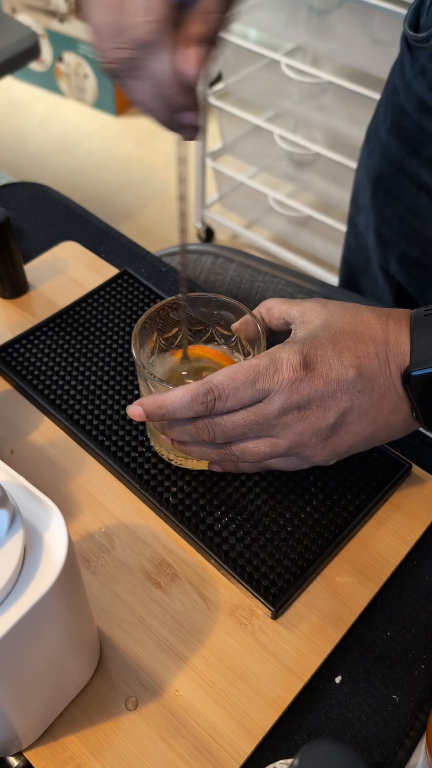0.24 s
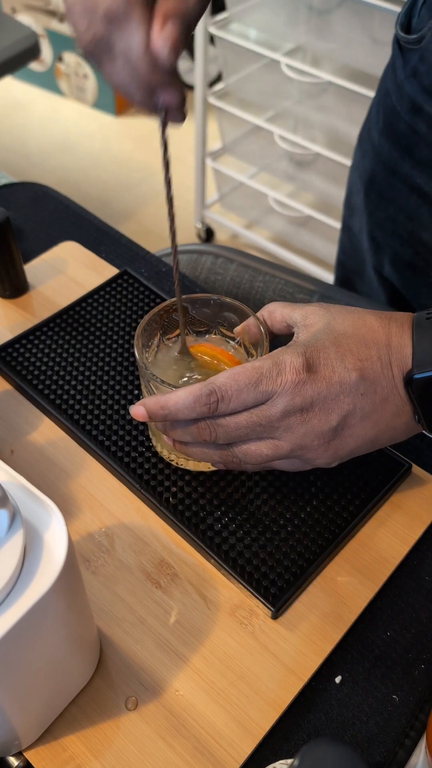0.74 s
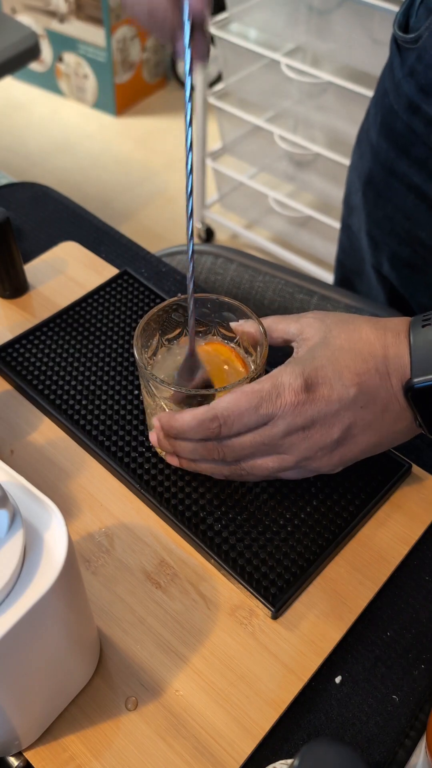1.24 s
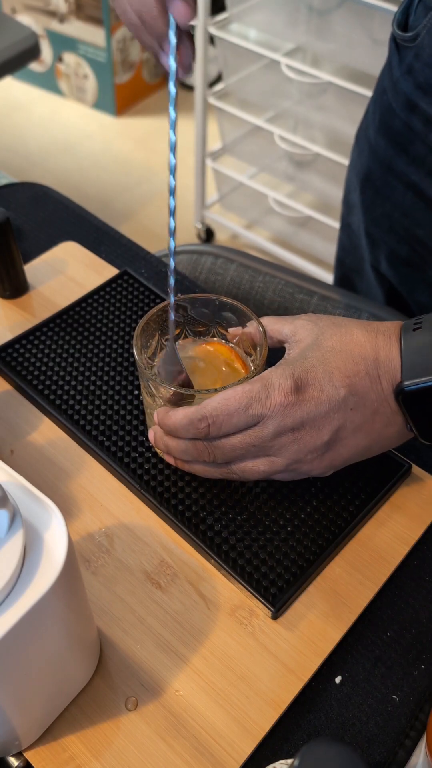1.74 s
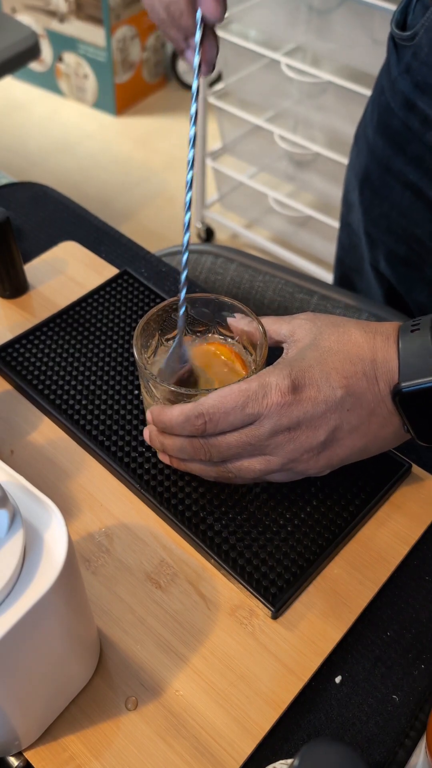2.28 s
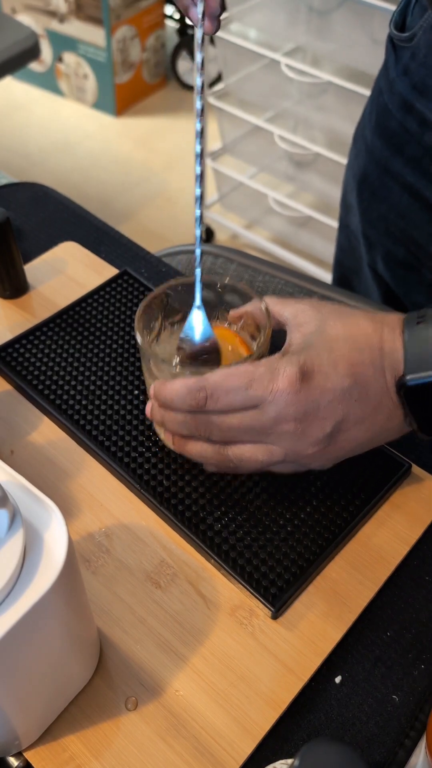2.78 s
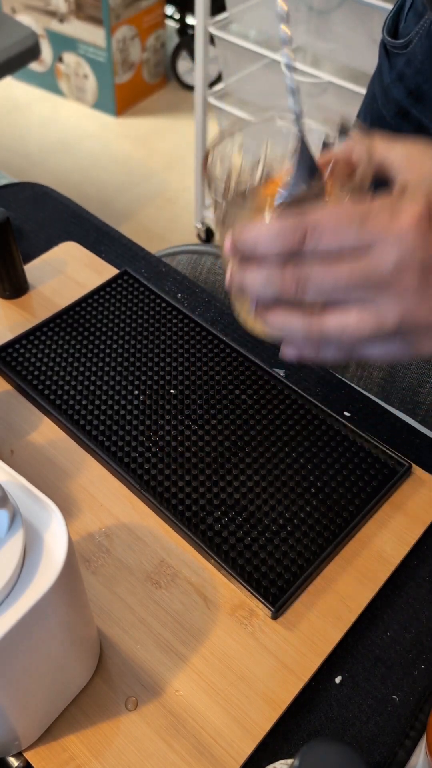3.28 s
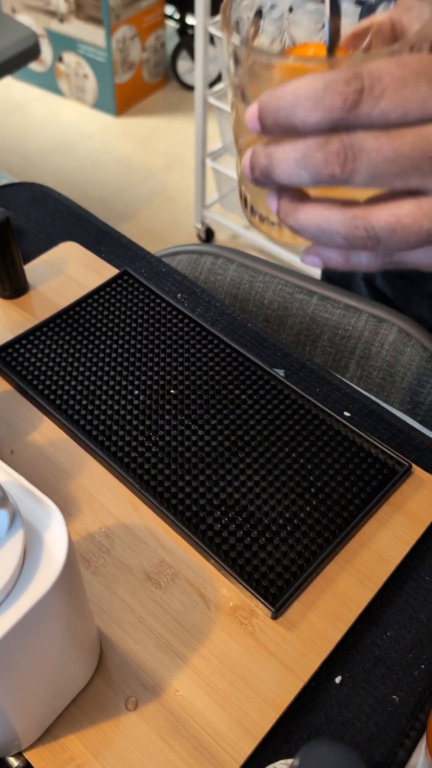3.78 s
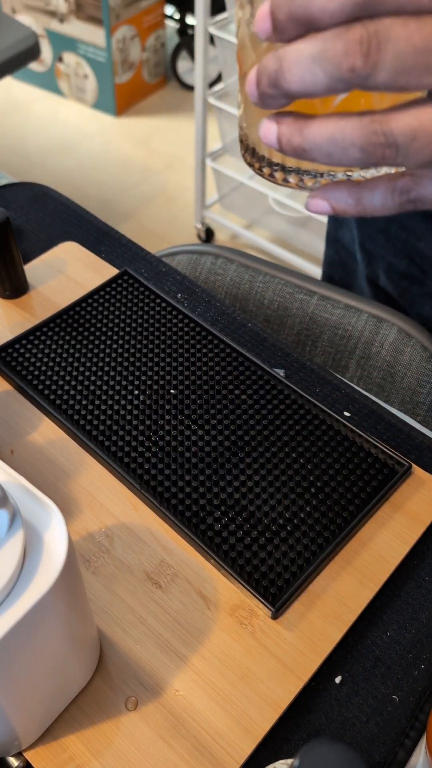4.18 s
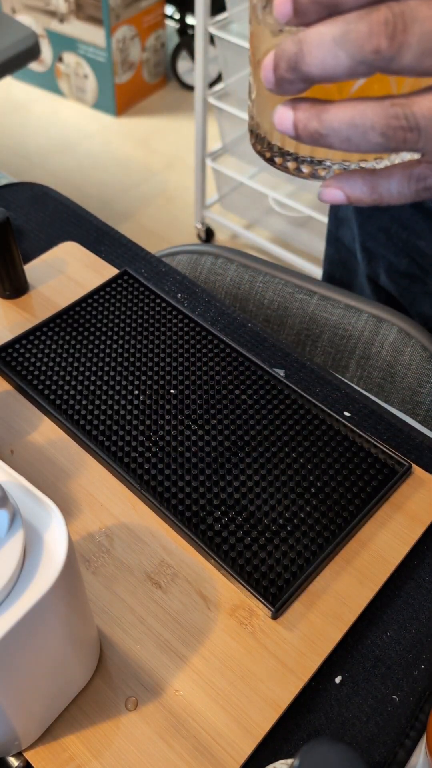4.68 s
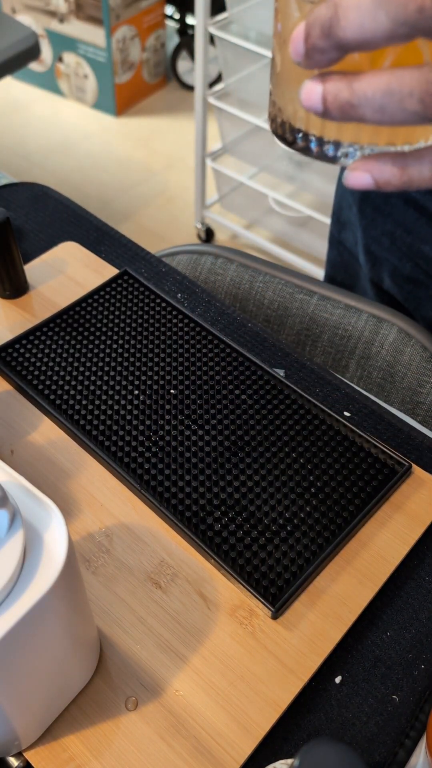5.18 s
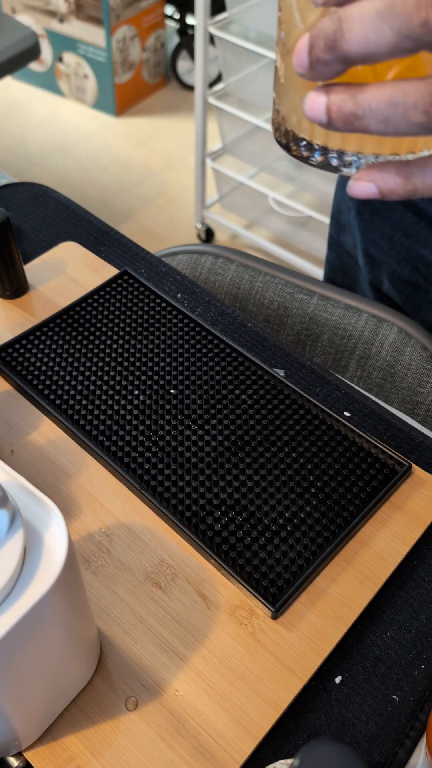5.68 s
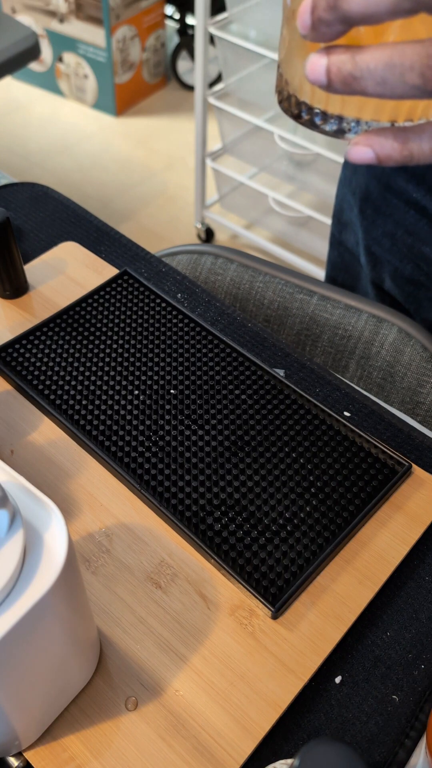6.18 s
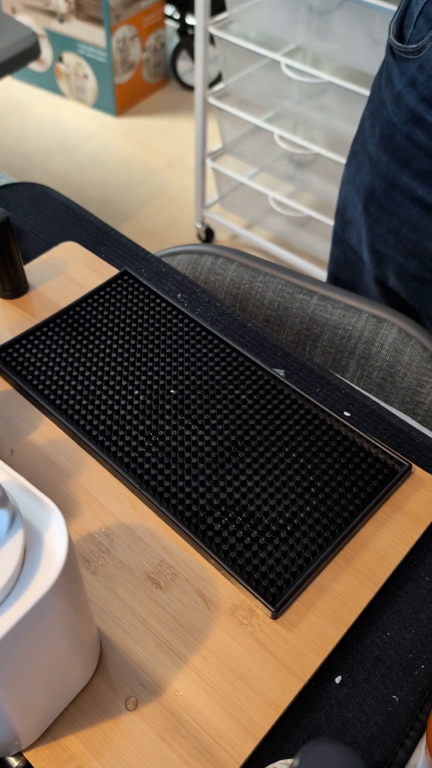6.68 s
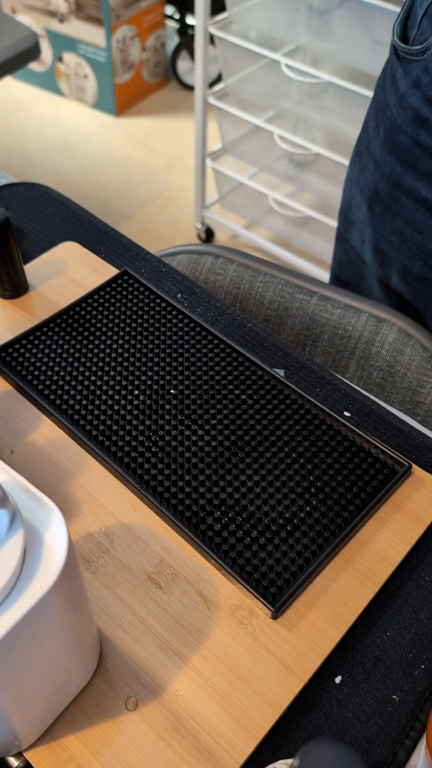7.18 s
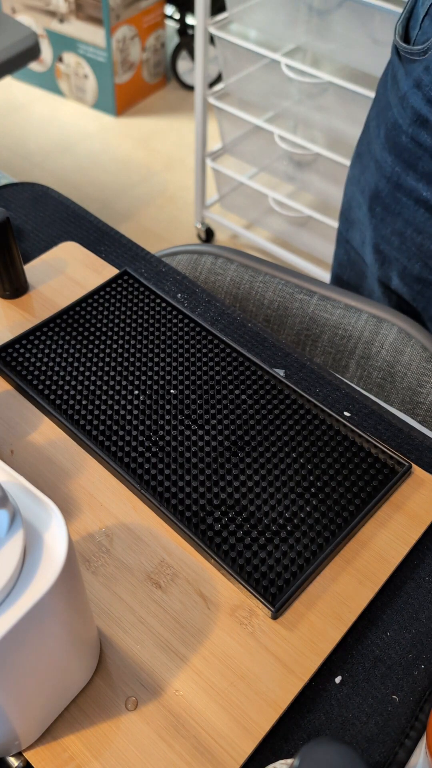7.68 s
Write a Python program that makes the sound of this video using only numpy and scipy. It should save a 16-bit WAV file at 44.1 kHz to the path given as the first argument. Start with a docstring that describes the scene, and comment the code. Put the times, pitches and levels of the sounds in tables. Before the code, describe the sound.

A ball of ice and a long metal spoon knock inside a thick glass tumbler. A quick cluster of duller knocks comes first, then bright, sharp clinks follow at uneven gaps, singly or in twos and threes. Each ring is cut short by the hand holding the glass, and the ice slides very faintly in between. The glass sounds close, in a small room with a low appliance hum and rumble.

```python
"""A ball of ice and a long metal spoon clink against a thick glass tumbler held in a hand.
Each knock makes the glass wall ring, the hand cuts the ring short, and a small room adds its echo.
The ice also slides softly along the wall. Behind it an appliance hums at twice the mains rate
over low rumble and faint hiss, and now and then a soft tone sounds far off."""
import sys
import numpy as np
from scipy import signal
from scipy.fft import rfft, irfft
from scipy.io import wavfile
from scipy.ndimage import uniform_filter1d

SR = 44100
rng = np.random.default_rng(int(sys.argv[2]) if len(sys.argv) > 2 else 0)


def dump_mix(stems):
    """Bounce the given channels to the path in sys.argv[1] as a 16-bit WAV at rate SR."""
    frames = np.atleast_2d(stems).T  # one column per channel
    limited = np.clip(frames, -1, 1)  # hard clip at full scale
    pcm = np.round(limited * 32767).astype(np.int16)
    wavfile.write(sys.argv[1], SR, pcm)


N = 349953


def amp(db):
    """Turns decibels (dB) into a number to multiply a sound by."""
    return 10 ** (np.asarray(db) / 20)


def unit_level(x):
    """Scales a sound so that its average (rms) level is 1."""
    return x / np.sqrt(np.mean(x ** 2) + 1e-20)


def at_pitch(rows, hz):
    """Reads between rows of (Hz, value), with octaves evenly spaced."""
    pitches, values = np.transpose(rows)
    return np.interp(np.log(hz + 1), np.log(pitches + 1), values)


def over_time(rows):
    """Joins rows of (seconds, value) into one value for every sample."""
    times, values = np.transpose(rows)
    return np.interp(np.arange(N) / SR, times, values)


def add(mix, at, sound):
    """Mixes a sound in, starting at the given sample."""
    part = mix[max(at, 0):][:len(sound)]
    part += sound[:len(part)]


def coloured(x, colour):
    """Makes some pitches louder and others softer, following rows of (Hz, dB)."""
    hz = np.fft.rfftfreq(x.shape[-1], 1 / SR)
    return irfft(rfft(x) * amp(at_pitch(colour, hz)), x.shape[-1])


def contact_noise(colour, fade_s, t, width=1.0):
    """A hit makes a puff of noise that drops 60 dB in fade_s; width sets how much the sides differ."""
    noise = rng.standard_normal(len(t)) + width * rng.standard_normal((2, len(t)))
    rise = 1 - np.exp(-t / 0.00033)
    return unit_level(coloured(noise, colour)) * amp(-60 * t / fade_s) * rise


def wall_ring(notes, t, spread_db=1.5, detune=0.0057):
    """Struck at a random spot, the wall rings with a group of fading notes."""
    hz, db, fade_s = np.transpose(notes)[:, :, None]
    pitch_luck, level_luck, *phase_luck = rng.standard_normal((4, len(notes), 1))
    hz = hz * (1 + detune * pitch_luck)
    level = amp(db + spread_db * level_luck - 60 * t / fade_s)
    rise = np.sin(np.pi / 2 * np.minimum(t / .0006, 1)) ** 2  # ice and wall touch for a moment
    # each microphone faces another part of the wall, so its waves are shifted
    waves = np.sin(2 * np.pi * hz * t + 0.48 * np.array(phase_luck))
    return (rise * level * waves).sum(1) / np.sqrt((level[:, 0] ** 2).sum() / 2)


# The wall bends in two to five waves round the rim. It is uneven, so each shape has a group of notes.
# The two-wave and three-wave groups. Each row: pitch multiplier, level in dB within the group,
# seconds to fade by 60 dB before the hand shortens it.
LOW_NOTES = [
    [(1, -1.5, 0.05), (1.07, -15, 0.052), (.965, -19, 0.18)],
    [(1, 3, 0.038), (1.025, -7, .03), (.975, -9, 0.08), (1.2, -8.5, .02), (1.005, -18.5, 0.15)],
]
# The four-wave and five-wave groups. Each row: pitch in Hz, then level and fade time as above.
HIGH_NOTES = [
    [(7620, -6.5, 0.0098), (7990, -4, 0.0096), (8084, -3.5, 0.04), (8480, -4.5, .014)],
    [(10530, -5.5, 0.016), (11620, -3, .015), (12500, -3, 0.026), (13700, -4, .013), (14400, -7.5, .012)],
]
# A hit's sharp crack, bright tick and dull thud. Each row: frequency in Hz, relative level in dB.
CRACK_COLOUR = [(1100, -51), (1700, -12.5), (2400, -1), (2900, 3), (3250, 6), (3700, -9), (5000, -13),
                (16500, -41.5)]
TICK_COLOUR = [(2500, -32), (5000, -2), (6200, 3.5), (7200, -2.5), (10000, -4.5), (14000, -13),
               (16500, -23.5)]
THUD_COLOUR = [(150, -30), (400, 0), (800, -3), (1300, -0.5), (2000, -10), (5000, -38.5)]
# The hand moves the glass and changes its grip. Each row: time in seconds, head start of the left side
# in milliseconds, left minus right level in dB, multiplier on the fade time.
HAND_MOVES = [(.6, -0.0019, -1, .9), (1.2, 0.083, -2.1, 0.61), (2.6, 0.21, 1.3, 0.78),
              (3.0, .38, -0.5, 0.81), (4.1, .37, 1.4, 0.66), (5.3, .37, 1.2, .82), (6.2, .36, 1.7, 0.58),
              (7.2, 0.52, 0.3, 0.63)]
# The knocks. Each row: start in seconds, two-wave pitch in Hz and level in dB, three-wave pitch in Hz
# and level in dB, then the levels in dB of the four-wave ring, five-wave ring, crack and thud.
CLINKS = [(0.0024, 1796, -47.5, 4540, -57, -61, -61, -52, -72),
          (0.091, 1740, -48, 4400, -69, -87, -96, -70, -63),
          (0.1438, 1790, -46, 4380, -56, -83, -84, -56, -56),
          (0.165, 1900, -50, 4520, -54, -73, -84, -44, -47.5),
          (0.1868, 1830, -38, 4540, -54, -83, -90, -64, -50),
          (0.2193, 1810, -34.5, 4620, -56, -70, -84, -69, -50),
          (0.2403, 1840, -31.5, 4580, -47, -75, -79, -50.5, -51),
          (0.2961, 1850, -35, 4430, -55, -62, -77, -49, -37.5),
          (0.3019, 1980, -28.5, 4620, -38, -63, -42.5, -35, -34),
          (0.319, 1885, -17.5, 4514, -36, -61, -53, -28, -33),
          (0.3545, 1852, -24, 4470, -43, -64, -62, -37, -43),
          (0.3692, 1895, -32, 4590, -41, -55, -49, -38, -45),
          (0.382, 1803, -28, 4510, -44, -51, -65, -37, -43.5),
          (1.3106, 1836, -27.5, 4503, -23.5, -27, -23.5, -35.5, -53),
          (1.4019, 1720, -58, 4540, -48.5, -54, -52, -57, -59),
          (1.4957, 1765, -34, 4360, -58, -84, -79, -59, -53),
          (1.7503, 1866, -30.5, 4530, -21.5, -27.5, -19.5, -33, -51.5),
          (1.8871, 1820, -50, 4510, -46.5, -68, -69, -49.5, -60),
          (1.909, 1790, -56.5, 4380, -70, -77, -82, -73, -71),
          (2.2466, 1845, -29, 4550, -29, -27, -23, -41, -51),
          (2.3137, 1794, -35.5, 4490, -34.5, -29.5, -26, -41, -46.5),
          (2.4861, 1750, -46, 4510, -70, -83, -82, -65, -57),
          (2.896, 1606, -43.5, 4550, -41, -83, -84, -66, -44),
          (2.9246, 1830, -62, 4650, -59.5, -78, -80.5, -65.5, -66),
          (2.9492, 1755, -41, 4530, -62, -72, -90, -62, -63),
          (3.0714, 1810, -27, 4548, -15.5, -24.5, -30.5, -27.5, -51),
          (3.1352, 1812, -42.5, 4380, -25, -34.5, -53, -43, -62),
          (3.4028, 1736, -39.5, 4273, -35.5, -41, -34, -39.5, -52),
          (3.454, 1830, -61.5, 4430, -42.5, -46, -40.5, -48, -57),
          (3.513, 1790, -42, 4510, -33, -39, -35, -42, -59),
          (3.521, 1784, -63, 4470, -36, -52, -47.5, -50, -70),
          (3.598, 1770, -52.5, 4510, -53, -68, -77, -70, -66),
          (3.8206, 1630, -35.5, 4560, -59.5, -72, -66, -32.5, -38),
          (4.0796, 1793, -34, 4460, -29, -34.5, -42, -38, -53),
          (4.13, 1830, -38, 4360, -27.5, -34, -33, -41, -53),
          (4.1868, 1826, -36.5, 4570, -29.5, -31, -35, -38, -56),
          (4.362, 1810, -42, 4350, -28, -45, -57, -39, -52),
          (4.4235, 1780, -28.5, 4450, -17, -21.5, -26.5, -21, -51),
          (4.447, 1836, -35, 4500, -39, -50, -59.5, -42, -67.5),
          (4.7664, 1900, -47, 4580, -36.5, -76, -81, -39.5, -64),
          (4.8488, 1800, -47.5, 4510, -61, -82.5, -94, -53.5, -65),
          (4.8663, 1800, -50, 4330, -68, -85, -90, -66, -69),
          (4.9893, 1866, -43, 4440, -38.5, -42.5, -52, -37.5, -59),
          (5.088, 1847, -34, 4300, -36, -67, -84, -40.5, -64),
          (5.3262, 1790, -41.5, 4430, -45.5, -56, -35, -37.5, -57),
          (5.3577, 1860, -28, 4530, -18.5, -21.5, -22, -21, -56),
          (5.438, 1755, -36.5, 4480, -42, -60, -69, -46, -49.5),
          (5.5035, 1826, -43.5, 4560, -29, -39, -50, -33.5, -61),
          (5.8175, 1860, -31, 4450, -25.5, -32.5, -40.5, -38, -66),
          (6.1263, 1814, -29, 4400, -20, -20, -32, -29.5, -65),
          (6.494, 1862, -23, 4350, -24, -32.5, -26.5, -27, -53),
          (6.5034, 1980, -41, 4440, -23, -27, -30, -49.5, -61),
          (6.7029, 1855, -29.5, 4370, -27, -40, -54, -40, -64),
          (7.2886, 1910, -27, 4370, -22.5, -32, -51, -35, -56),
          (7.3377, 1844, -35.5, 4420, -32, -38, -52, -43, -70),
          (7.4956, 1850, -36.5, 4563, -20.5, -29.5, -32.5, -36.5, -60),
          (7.7489, 1840, -43, 4400, -43.5, -60, -88, -50.5, -70),
          (7.9025, 1830, -31.5, 4530, -22, -28, -34, -29, -60.5),
          (7.9122, 1920, -40, 4540, -37, -38, -42, -46, -50)]


def clinks():
    """Each knock on the glass is a crack, a tick and a thud, plus a ring that the hand damps."""
    out, t = np.zeros((2, N)), np.arange(SR // 5) / SR
    # the wall sends out little sound below its lowest note
    low_cut = signal.butter(4, 1450, "high", fs=SR, output="sos")
    times, leads, pans, dampings = np.transpose(HAND_MOVES)
    onset_delay_ms = .8  # each clink sounds just after its listed start
    for start, hz2, db2, hz3, db3, db4, db5, crack_db, thud_db in CLINKS:
        fade_scale = np.interp(start, times, dampings)
        tick_db = -0.5 + .45 * crack_db + .55 * db5
        sound = amp(crack_db) * contact_noise(CRACK_COLOUR, fade_s=0.02, t=t)
        sound += amp(tick_db) * contact_noise(TICK_COLOUR, fade_s=0.024, t=t)
        for notes, hz, db in zip(LOW_NOTES, (hz2, hz3), (db2, db3)):
            sound += amp(db) * wall_ring(np.multiply(notes, (hz, 1, fade_scale)), t)
        for notes, db in zip(HIGH_NOTES, (db4, db5)):
            damped = np.multiply(notes, (1, 1, fade_scale))
            sound += amp(db) * wall_ring(damped, t, spread_db=1, detune=.015)
        sound = signal.sosfilt(low_cut, sound)
        sound += amp(thud_db) * contact_noise(THUD_COLOUR, fade_s=0.029, t=t, width=.25)
        lead_ms, pan_db = np.interp(start, times, leads), np.interp(start, times, pans)
        for ear, part, side in zip(out, sound, (1, -1)):
            onset = start + (onset_delay_ms - side * lead_ms / 2) / 1000
            add(ear, round(onset * SR), part * amp(side * pan_db / 2))
    return out


# How loudly the ice slides. Each row: time in seconds, level in dB.
SLIDE_LEVELS = [(0, -56), (.2, -90), (.35, -68.5), (1.1, -74.5), (2.7, -74.5), (3.2, -73), (3.9, -75),
                (4.35, -69), (5.3, -72), (6.8, -76.5), (7.45, -73), (7.94, -74.5)]


def sliding_ice(pitches_hz=(1830, 4450), fade_scale=0.26, ticks_per_second=1500):
    """Tiny random ticks ring the wall's two lowest groups of notes, damped by the touching ice."""
    ticks = rng.standard_normal((2, N)) * (rng.random((2, N)) < ticks_per_second / SR)
    t = np.arange(SR // 10) / SR
    ring = sum(wall_ring(np.multiply(notes, (hz, 1, fade_scale)), t)
               for notes, hz in zip(LOW_NOTES, pitches_hz))
    scrape = signal.oaconvolve(ticks, ring, axes=1)[:, :N]
    return amp(over_time(SLIDE_LEVELS)) * unit_level(scrape)


# How long the room's tail lasts. Each row: frequency in Hz, seconds to fade by 60 dB.
ROOM_FADES = [(800, 0.39), (2000, 0.3), (4500, 0.24), (8000, 0.28), (14000, .2)]
# Bounces off the table top and shelves. Each row: delay in milliseconds, level in dB against the tail.
ECHOES = [(1.8, 5.5), (4.7, -2), (7, -3), (9.6, -4.5), (14, -8), (19, -6.5)]


def room_echo(sound, level_db=-9):
    """Sound bounces off nearby surfaces, then blurs into a fading tail of many small echoes."""
    bounces = np.zeros((2, SR // 2))
    slots = np.arange(400, SR // 2 - 20, 20)
    at = slots + rng.integers(0, 20, (2, len(slots)))  # one bounce somewhere in each slot
    np.put_along_axis(bounces, at, rng.choice([-1., 1.], at.shape), 1)
    hz, t, bands = signal.stft(bounces, SR, nperseg=256)
    fade = amp(-60 * t / at_pitch(ROOM_FADES, hz)[:, None])
    tail = signal.istft(bands * fade, SR, nperseg=256)[1]
    tail /= np.linalg.norm(tail[0])
    for ms, db in ECHOES:
        for ear, jitter_ms in zip(tail, rng.uniform(-0.33, 0.33, 2)):
            add(ear, round((ms + jitter_ms) * SR / 1000), amp([db]) * rng.choice([-1, 1]))
    return signal.fftconvolve(sound * amp(level_db), tail, axes=1)[:, :N]


# The wavering main note of the hum. Each row: time in seconds, level in dB.
HUM_LEVELS = [(0.0, -45), (0.31, -42.5), (0.64, -54), (0.66, -65), (0.75, -46), (1.02, -40.5), (1.7, -49),
              (1.79, -41), (2.01, -45), (2.34, -38.5), (2.85, -43), (3.98, -40.5), (4.51, -36.5),
              (4.6, -41), (4.64, -32.5), (4.82, -44), (5.88, -42.5), (6.21, -50), (6.3, -41), (6.78, -49.5),
              (6.96, -43.5), (7.94, -40.5)]
# Its weaker notes. Each row: multiple of the main pitch, level in dB.
WEAK_HUM_NOTES = [(.5, -60), (1.5, -64.5), (2, -66)]


def appliance_hum(hz=120.15, flutter_db=2.8):
    """An appliance hums at twice the mains rate, with weaker notes that flutter at random."""
    angle = 2 * np.pi * hz * np.arange(N) / SR
    out = amp(over_time(HUM_LEVELS)) * np.sqrt(2) * np.sin(angle + 2 * np.pi * rng.random())
    for multiple, db in WEAK_HUM_NOTES:
        slow_noise = uniform_filter1d(uniform_filter1d(rng.standard_normal(N), 6000), 6000)
        level = amp(db + flutter_db * unit_level(slow_noise))
        out += level * np.sqrt(2) * np.sin(multiple * angle + 2 * np.pi * rng.random())
    return out * amp([[-.3], [.3]])  # a little louder on the right


# The room's background noise. Each row: frequency in Hz, relative level in dB.
RUMBLE_COLOUR = [(15, -74.5), (30, -44.5), (42, -20.5), (52, -7.5), (65, -10), (90, -9), (120, -2),
                 (160, -7), (240, -14), (400, -28), (900, -33.5), (1800, -33.5), (4400, -41), (6700, -51),
                 (10000, -58.5), (16500, -73)]
# How alike its two sides are. Each row: frequency in Hz, likeness (1 is the same, 0 is unrelated).
RUMBLE_LIKENESS = [(60, 0.94), (180, 0.93), (550, 0.49), (1650, -0.24), (4970, -0.06), (15000, 0.73)]


def room_rumble(level_db=-52.5, drift_db=2.1):
    """Low rumble with a little hiss; patches of its pitch range drift louder and softer."""
    frames, hz = N // 512 + 5, np.fft.rfftfreq(2048, 1 / SR)
    *noise, drift = rng.standard_normal((frames, 1025, 5)).T
    drift = unit_level(uniform_filter1d(uniform_filter1d(drift, 12, 0), 8, 1))
    likeness = at_pitch(RUMBLE_LIKENESS, hz)[:, None]
    left, unrelated = noise[0] + 1j * noise[1], noise[2] + 1j * noise[3]
    right = likeness * left + np.sqrt(1 - likeness ** 2) * unrelated
    bands = np.array([left, right]) * amp(at_pitch(RUMBLE_COLOUR, hz)[:, None] + drift_db * drift)
    rumble = signal.istft(bands, nperseg=2048, noverlap=1536)[1][:, :N]
    return amp(level_db) * unit_level(rumble)


# How loud the faint hiss is. Each row: time in seconds, level in dB.
HISS_LEVELS = [(0, -70), (.66, -73), (1.1, -90), (2.5, -79.5), (4.8, -80), (5.9, -74.5), (6.5, -70.5),
               (7.5, -76.5), (7.94, -73)]


def hiss():
    """Fine noise in the lower treble swells and fades."""
    colour = [(1200, -35.5), (2500, 1.5), (6000, -3.5), (7500, -14.5), (8600, -17.5),
              (10000, -30), (12000, -35.5)]
    noise = coloured(rng.standard_normal((2, N)), colour)
    return amp(over_time(HISS_LEVELS)) * unit_level(noise)


# The far-off tones. Each row: start in seconds, length in seconds, pitch in Hz, level in dB.
FAR_TONES = [(.03, 0.12, 492, -56.5), (2.75, .09, 527, -65), (5.42, 0.17, 510, -68.5),
             (6.82, 0.12, 494, -62)]


def far_tones(tremble_hz=18):
    """Soft, pure tones swell, tremble and die away."""
    out = np.zeros((2, N))
    for start, length, hz, db in FAR_TONES:
        t = np.arange(round(length * SR)) / SR
        swell = np.sin(np.pi * t / length) ** 0.34
        tremble = 1 + 0.62 * np.cos(2 * np.pi * tremble_hz * t)
        for ear, phase in zip(out, (0, .9)):
            tone = np.sqrt(2) * np.sin(2 * np.pi * hz * t + phase)
            add(ear, round(start * SR), amp(db) * swell * tremble * tone)
    return out


# The two microphones face different ways. Each row: frequency in Hz, left minus right level in dB.
MIC_FACING = [(1000, -2), (2000, 2), (3200, 2), (4500, -5.5), (6200, 5.5), (8200, 5), (12000, 4)]


def scene():
    """The glass, heard directly and through the room's echo, over the background sounds."""
    glass = clinks() + sliding_ice()
    direct = np.array([coloured(ear, np.multiply(MIC_FACING, (1, side / 2)))
                       for ear, side in zip(glass, (1, -1))])
    return direct + room_echo(glass) + appliance_hum() + room_rumble() + hiss() + far_tones()


def record(dry):
    """The microphones lose the deepest bass, below 42 Hz; treble above 16600 Hz is cut too."""
    bass_cut = signal.butter(4, 42, "high", fs=SR, output="sos")
    treble_cut = signal.firwin(511, 16600, window=("kaiser", 9), fs=SR)
    return signal.oaconvolve(signal.sosfilt(bass_cut, dry), treble_cut[None], "same")


dry = scene()
out = record(dry)
dump_mix(out)
```